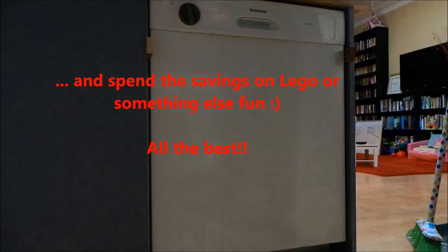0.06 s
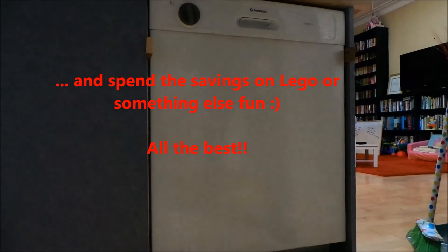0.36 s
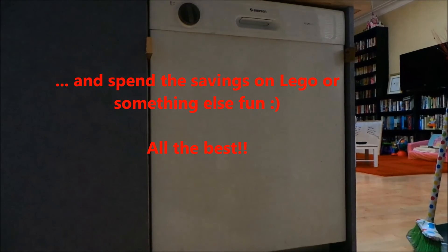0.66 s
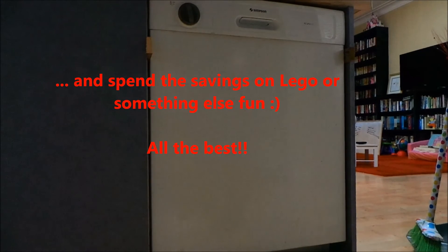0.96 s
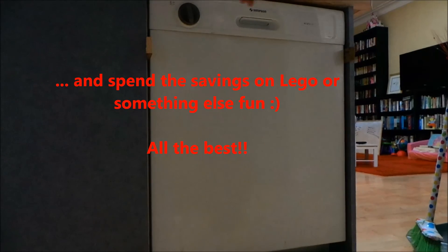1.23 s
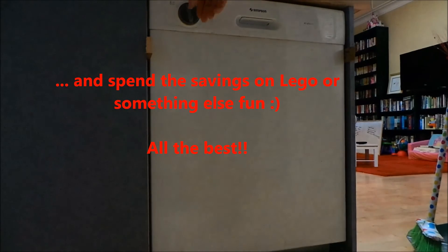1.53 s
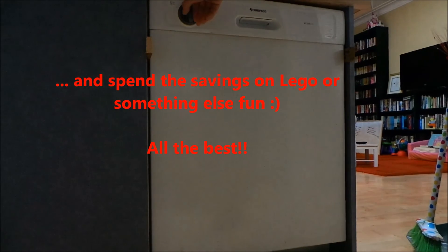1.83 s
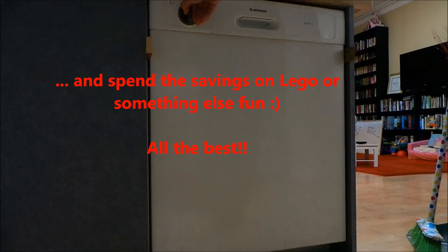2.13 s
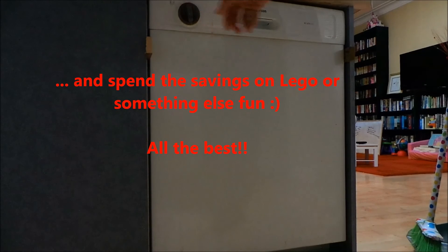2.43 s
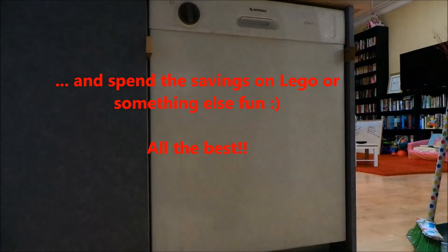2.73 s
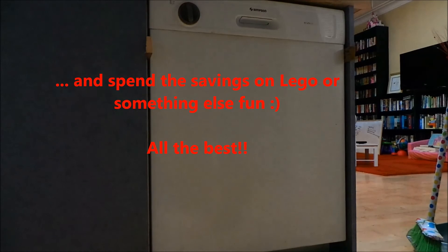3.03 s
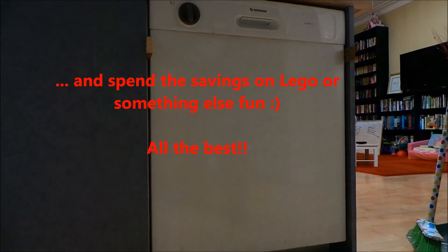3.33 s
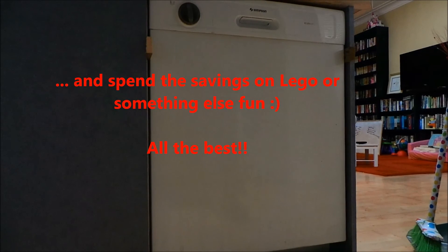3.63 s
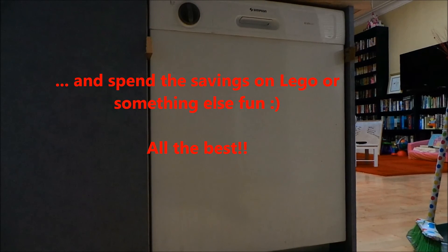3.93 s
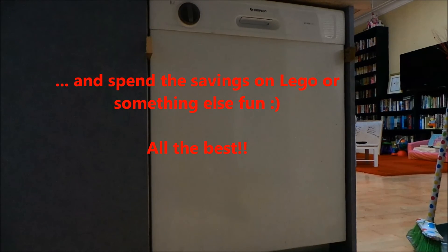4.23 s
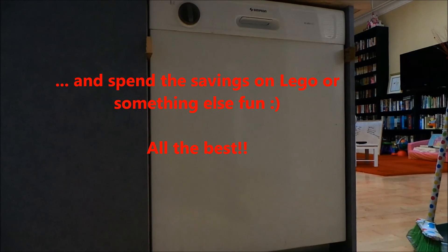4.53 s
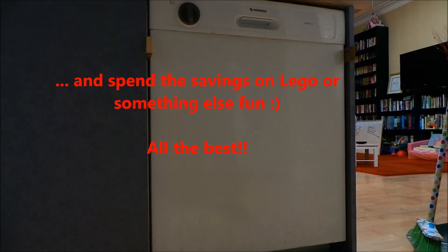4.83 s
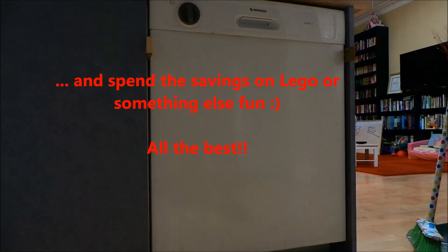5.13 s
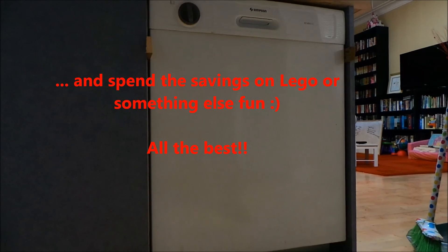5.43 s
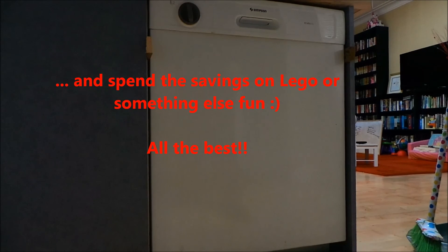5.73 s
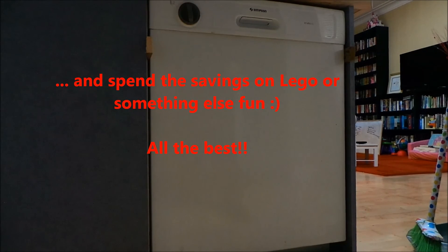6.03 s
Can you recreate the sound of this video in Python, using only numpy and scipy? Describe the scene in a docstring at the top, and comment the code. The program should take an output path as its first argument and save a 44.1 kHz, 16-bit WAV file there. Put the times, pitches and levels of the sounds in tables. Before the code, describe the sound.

In a quiet kitchen, a dishwasher's door and dial give a quick cluster of knocks and clacks over a soft hiss. A switch snaps and the drain pump runs up to a low hum, gulping air and churning water. The panel clacks twice more, and faint drips fall in the tub as the hum carries on. The nearly mono microphone is a couple of metres away.

```python
"""A dishwasher starts up in a kitchen, a couple of metres from a nearly mono microphone.
Door and programme dial knock the front panel, the switch snaps, and the drain pump runs up to a mains hum.
The pump gulps air and churns water, the tub resounds and drips, and the panel clacks twice more.
Underneath lie quiet room tone, a faint drone and a soft hiss that sinks away as the pump starts."""
import sys
import numpy as np
from scipy import signal
from scipy.fft import rfft, irfft
from scipy.io import wavfile
from scipy.ndimage import uniform_filter1d

SR = 44100
rng = np.random.default_rng(int(sys.argv[2]) if len(sys.argv) > 2 else 0)


def generate_wav(sig):
    """Save sig (samples, or channels by samples) to the path in sys.argv[1] as 16-bit PCM at SR."""
    pcm = np.round(np.clip(np.atleast_2d(sig).T, -1, 1) * 32767).astype(np.int16)
    wavfile.write(sys.argv[1], SR, pcm)


N = 268260
SWITCH_S = 2.1025  # the switch snaps and the pump starts


def undb(db):
    """Decibels to gain."""
    return 10 ** (np.asarray(db) / 20)


def unit(x):
    """Scale to rms 1."""
    return x / np.sqrt(np.mean(x ** 2))


def noise(spectrum, size=N):
    """Noise of rms 1, coloured by points of f/Hz, level/dB."""
    hz, db = np.transpose(spectrum)
    f = np.maximum(np.arange(size // 2 + 1) * SR / size, 1)
    gain = undb(np.interp(np.log(f), np.log(hz), db)) * np.minimum(f / hz[0], 1) ** 2
    return unit(irfft(rfft(rng.standard_normal(size)) * gain, size))


def band(x, hz, kind, order=3):
    """Low-pass or high-pass filter."""
    return signal.sosfilt(signal.butter(order, hz, kind, fs=SR, output="sos"), x)


def walk(rate):
    """Smooth random wavering of rms 1, with rate new values a second."""
    hold = int(SR / rate)
    steps = np.repeat(rng.standard_normal(N // hold + 1), hold)
    return unit(uniform_filter1d(uniform_filter1d(steps, hold), hold)[:N])


def ramp(t, start, length):
    """Straight rise from 0 to 1."""
    return np.clip((t - start) / length, 0, 1)


def bump(t, centre, half):
    """Smooth rise and fall, 1 at the centre."""
    return np.exp(-((t - centre) / half) ** 2)


def fade(t, t60):
    """Free decay, 60 dB in t60."""
    return np.exp(-np.log(1000) * t / t60)


def ring(t, modes, stretch=1):
    """Damped modes struck by one blow, a little different each time."""
    return sum(undb(db + rng.normal()) * np.sin(2 * np.pi * hz * t) * fade(t, t60 * stretch)
               for hz, db, t60 in modes)


def burst(x, db):
    """Set the level of a blow's first 30 ms."""
    return x * undb(db) / np.sqrt(np.mean(x[:int(.03 * SR)] ** 2))


def add(track, s, x):
    """Mix x into the track at time s."""
    i = int(s * SR)
    track[i:i + len(x)] += x[:max(N - i, 0)]


def room_tone(t, level_db=-57.5, waver_db=1.66):
    """The quiet kitchen: low noise and a faint drone, both wavering."""
    # colour of the still room: f/Hz, level/dB
    air_colour = [(18, -35), (30, -13), (59, -23), (70, -3.5), (104, 9.5), (121, -14.5), (153, -8),
                  (174, -6), (270, -11), (453, -9.5), (602, -16.5), (1090, -21.5), (1450, -28), (4890, -46),
                  (14500, -41)]
    # tones of the drone: f/Hz, level/dB
    drone_tones = [(48.6, -61), (97.2, -70.5), (145.6, -70), (479, -67.5)]
    drone = sum(undb(db + 1.2 * walk(7.1)) * np.sin(2 * np.pi * hz * t + 0.11 * walk(5.5))
                for hz, db in drone_tones)
    air = unit(band(noise(air_colour), 131, "high", order=2)) * undb(level_db + waver_db * walk(22.45))
    return air + np.sqrt(2) * drone


def soft_hiss(t, start_db=-58.5, sink_db_per_s=4.5, swell_db=10.5, dip_db=-15):
    """A sinking hiss swells around the first knocks, dips briefly and is gone as the pump starts."""
    # colour of the hiss: f/Hz, level/dB
    colour = [(200, 1), (450, 21), (800, 7), (1600, 4), (2300, 5), (3000, 0.5), (6000, -0.5), (8500, -1),
              (10500, 0), (12000, -5.5), (14500, -9)]
    swell = ramp(t, 0.28, 0.073) - ramp(t, 0.643, 0.096)
    level_db = start_db - sink_db_per_s * t + swell_db * swell + dip_db * bump(t, 0.808, 0.018)
    return noise(colour) * undb(level_db) * (1 - ramp(t, 1.83, 0.31))


def kitchen_echo(x, wet_db=-8, low_t60=0.35, high_t60=0.34, high_db=-4, side_db=-7):
    """Diffuse echo off the kitchen walls; only the top treble differs between left and right."""
    t = np.arange(SR * 3 // 4) / SR
    low, high, side = rng.standard_normal((3, len(t)))
    onset = 1 - np.exp(-t / 0.0013)
    low, high = band(low, 2700, "low", order=8), band(high, 2700, "high", order=8)
    tail = onset * (low * fade(t, low_t60) + undb(high_db) * high * fade(t, high_t60))
    spread = onset * band(side, 9600, "high") * fade(t, high_t60) * undb(side_db)
    gain = undb(wet_db) / np.sqrt(np.sum(tail ** 2))
    return np.array([x + gain * signal.fftconvolve(x, tail + sign * spread)[:N] for sign in (1, -1)])


def drips(pitch_spread=0.084, bubbles=7):
    """Each drip in the tub is a little cluster of ringing bubbles of about the same size."""
    # drips and trickles: t/s, f/Hz, level/dB, rough length/s
    drops = [(2.511, 2810, -58, 0.092), (2.54, 2160, -62.5, 0.068), (2.555, 1350, -59, 0.08),
             (2.585, 3100, -65, 0.047), (3.389, 1890, -61, 0.13), (3.715, 1820, -57, 0.02),
             (3.797, 664, -61, 0.037), (4.37, 1130, -64, 0.056), (4.478, 1180, -71, 0.033),
             (4.598, 1040, -63, 0.034)]
    out, t = np.zeros(N), np.arange(SR // 4) / SR
    for s, hz, db, length in drops:
        bubble_hz = hz * (1 + pitch_spread * rng.standard_normal((bubbles, 1)))
        delay = rng.exponential(length / 5, (bubbles, 1))
        age = np.maximum(t - delay + delay.min(), 0)
        cluster = np.sin(2 * np.pi * bubble_hz * age) * fade(age, 0.34 * length)
        add(out, s, burst(cluster.sum(axis=0), db))
    return out


def gulps(glide=-0.056, swell_cycles=0.63):
    """Air pockets in the pump swell over a cycle or so, then ring out with a sinking pitch."""
    # swallows of air and water: t/s, starting f/Hz, peak level/dB, t60/s
    pockets = [(2.105, 232, -35.5, 0.2), (2.125, 146, -36.5, 0.17), (2.172, 137, -30, 0.093),
               (2.174, 285, -31, 0.031), (2.237, 100.3, -25, 0.15), (2.253, 171, -29, 0.072),
               (2.286, 200, -31.5, 0.06), (2.298, 89, -31, 0.21), (2.515, 235, -42, 0.077),
               (2.603, 113.4, -35, 0.29), (2.704, 141, -30.5, 0.051), (2.876, 99, -36, 0.15)]
    out, t = np.zeros(N), np.arange(SR // 3) / SR
    for s, hz, db, t60 in pockets:
        phase = 2 * np.pi * hz * t * (1 + glide * np.minimum(t / t60, 1))
        shape = (1 - np.exp(-t * hz / swell_cycles)) * fade(t, t60)
        add(out, s, undb(db) * np.sin(phase) * shape / shape.max())
    return out


def switch(snap_db=-29, spring_db=-39, t60=0.12, cabinet_db=-19, cabinet_t60=0.19):
    """The start switch snaps over: a bright crack that lingers in the cabinet, and a ringing spring."""
    # colour of the snap: f/Hz, level/dB
    snap_colour = [(120, -28), (200, -10.5), (368, -16), (714, -7.5), (885, -18), (1340, -7), (1460, -13),
                   (2090, -18), (2500, -17), (2990, -17), (6240, -16), (8030, -21), (10100, -12),
                   (11500, -21), (14500, -20.5)]
    # modes of the housing and spring: f/Hz, relative level/dB, t60/s
    spring_modes = [(1300, -4, .18), (1356, -1, .2), (1386, -4, .18), (9747, 3, .15), (10065, 1, .11),
                    (10400, -3, .1), (10750, -3, .1)]
    out, t = np.zeros(N), np.arange(SR // 2) / SR
    shape = (fade(t, t60) + undb(cabinet_db) * fade(t, cabinet_t60)) * (1 - fade(t, 0.013))
    snap = noise(snap_colour, size=len(t)) * shape
    add(out, SWITCH_S, burst(snap, snap_db) + burst(ring(t, spring_modes), spring_db))
    return out


def knocks(modes_db=-3, spot_db=-2, crack=0.19, crack_t60=0.11, tick_t60=0.82, door_t60=0.16):
    """Knocks ring the front panel: the struck spot thuds, the upper modes clack, the contact ticks."""
    # blows on door and controls: t/s, thud/dB, clack/dB, tick/dB, spot f/Hz, clack top f/Hz, t60/s
    blows = [(0.319, -52, -66, -79, 402, 1590, .02), (0.338, -32, -48, -75, 354, 3130, 0.037),
             (0.369, -48, -51.5, -67, 360, 2900, 0.065), (0.393, -71, -58, -58, 400, 3960, 0.016),
             (0.448, -71, -49, -67, 500, 2600, 0.11), (0.4614, -28.5, -27.5, -55, 519, 2760, 0.056),
             (0.485, -57, -47, -59, 480, 2680, 0.039), (0.655, -74, -53, -65, 600, 2820, 0.04),
             (0.667, -57, -55, -73, 700, 1890, 0.023), (0.754, -81, -57, -71.5, 600, 2890, 0.018),
             (0.8443, -42.5, -56, -71, 410, 2630, 0.029), (0.893, -50, -43, -65, 493, 3500, 0.015),
             (0.931, -36.5, -52, -67, 356, 2800, 0.063), (0.9368, -30, -40.5, -61.5, 392, 3460, 0.042),
             (1.638, -54, -56, -63, 338, 5160, 0.021), (1.657, -54, -69, -74, 220, 4000, 0.13),
             (1.871, -83, -73, -67, 480, 4500, 0.011), (3.0382, -27, -32, -51, 475, 3760, 0.08),
             (3.045, -33, -33, -58, 630, 3200, 0.037), (3.052, -28.5, -35.5, -48, 487.3, 3100, 0.2),
             (3.506, -41, -47, -79, 398, 3120, 0.075), (3.555, -26.5, -38.5, -60, 369, 2820, 0.048)]
    # modes of the door panel: f/Hz, relative level/dB, t60/s for a blow that rings for door_t60
    door_modes = [(184, -9, .2), (240, -14, .15), (285, -10, .16), (358, -2, .22), (484, -2, .18),
                  (556, 0, .2), (598, -6, .15), (631, -5, .2), (876, -6, .12), (968, -4, .14),
                  (1196, -4, .15), (1298, -1, .17), (1594, -3, .17), (1831, -3, .14), (1907, -4, .14),
                  (2068, -2, .16), (2112, 0, .17), (2288, -3, .16), (2363, -6, .15)]
    # dense ring of the panel and latch: f/Hz, level/dB
    rattle_colour = [(110, -27), (180, -6), (500, -6), (760, -8), (1000, -2.5), (1300, -3.5), (1480, -6.5),
                     (1750, -4), (2150, -9.5), (2600, -11), (3200, -12.5), (4200, -10.5), (7000, -19.5),
                     (14000, -41)]
    out, t = np.zeros(N), np.arange(SR // 2) / SR
    for s, thud_db, clack_db, tick_db, spot_hz, top_hz, t60 in blows:
        rattle = noise(rattle_colour, size=len(t)) * (fade(t, t60) + crack * fade(t, crack_t60))
        modes = ring(t, door_modes, stretch=t60 / door_t60)  # a hand on the door shortens the ring
        panel = burst(modes, modes_db) + burst(rattle, 0)
        spot = np.sin(2 * np.pi * spot_hz * t) * fade(t, 1.02 * t60)
        thud = band(burst(band(panel, 775, "low"), 0) + burst(spot, spot_db), 220, "high")
        clack = band(band(panel, 520, "high"), top_hz, "low", order=7)  # harder contact, higher modes
        tick = band(rattle, 4020, "high", order=6) * fade(t, tick_t60)
        add(out, s, burst(thud, thud_db) + burst(clack, clack_db) + burst(tick, tick_db))
    return out


def water_levels(t, hiss_db=-59.5, tub_db=-53, churn_db=-42.5):
    """Levels in dB of hiss, tub and churning: steady but for three surges of water."""
    # surges: t/s, half length/s, hiss lift/dB, tub lift/dB, churning lift/dB
    surges = [(2.2, 0.1, 6.5, 7, 5.5), (3.36, 0.17, 4, 5.5, 3.5), (3.598, 0.089, 6, 1, -1.5)]
    lift_db = sum(np.outer(lifts, bump(t, s, half)) for s, half, *lifts in surges)
    return np.array([[hiss_db], [tub_db], [churn_db]]) + lift_db


def draining_water(t, rotor_angle, hiss_db, tub_db, churn_db, slosh_db=-2.5, throb=0.13):
    """Water sloshes in the sump, the tub resounds and throbs with the pump, and the flow hisses."""
    # water churning in the sump: f/Hz, level/dB
    sump_colour = [(40, -22), (70, -15), (92, 6), (115, 12.5), (140, 1.5), (175, 5.5), (215, -0.5),
                   (255, -12), (310, -25), (480, -42)]
    # resonance of the tub: f/Hz, level/dB
    tub_colour = [(250, 8.5), (340, 4), (500, 1.5), (650, -0.5), (720, 0.5), (820, -7), (980, -9.5),
                  (1120, -6), (1450, -13), (2000, -41.5)]
    # hiss of water on its way to the drain: f/Hz, level/dB
    flow_colour = [(300, 9.5), (900, 0), (1700, 0), (2200, 3.5), (2800, 3.5), (3150, 2), (3600, 3.5),
                   (4800, -0.5), (5750, 1), (6700, -2), (8500, -3), (10500, -5.5), (12000, -8.5),
                   (14500, -56)]
    flow = ramp(t, start=1.968, length=0.2)
    slosh = noise(sump_colour) * undb(churn_db + slosh_db + walk(40))
    tub = noise(tub_colour) * undb(tub_db + walk(45)) * (1 + throb * np.sin(2 * rotor_angle))
    hiss = noise(flow_colour) * undb(hiss_db + .5 * walk(50))
    return flow ** 3 * slosh + flow * (tub + hiss)


def pump_hum(t, rotor_angle, churn_db, spin_up_s=0.21):
    """The drain pump hums at twice the mains rate, strongly while its impeller is full of water."""
    # course of the hum: t/s, hum level/dB, octave level/dB
    hum_course = [(2.36, -41.5, -43.5), (3.28, -52, -43.5), (3.41, -31.5, -44), (3.85, -37.5, -43.5),
                  (4.13, -33.5, -44.5), (4.27, -43.5, -48), (4.65, -42, -46.5), (4.95, -38.5, -54.5),
                  (5.65, -36, -48.5), (6.08, -48.5, -47)]
    # side tones, each wavering alone: multiple of the mains, level/dB relative to the churning
    side_tones = [(1, -17.5), (3, -11), (4.5, -12.5), (5, -13), (6, -27.5), (8, -20.5), (10, -22.5),
                  (13.85, -22.5)]
    times, hum_db, octave_db = np.transpose(hum_course)
    hum = np.sin(2 * rotor_angle) * undb(np.interp(t, times, hum_db) + 1.5 * walk(16))
    octave = np.sin(4 * rotor_angle) * undb(np.interp(t, times, octave_db) + 2.5 * walk(16))
    tones = sum(undb(db + 3 * walk(18)) * np.sin(multiple * rotor_angle + rng.uniform(0, 2 * np.pi))
                for multiple, db in side_tones)
    return np.sqrt(2) * ramp(t, SWITCH_S, spin_up_s) * (hum + octave + tones * undb(churn_db))


def drain_pump(t, mains_hz=50, wander_rad=0.16):
    """The mains-locked rotor hums and drives the water, lagging and leading with the load."""
    rotor_angle = 2 * np.pi * mains_hz * t + wander_rad * walk(9)
    hiss_db, tub_db, churn_db = water_levels(t)
    hum = pump_hum(t, rotor_angle, churn_db)
    return hum + draining_water(t, rotor_angle, hiss_db, tub_db, churn_db)


def scene():
    """From a couple of metres: knocks, switch and drips echo in the kitchen over pump and room tone."""
    t = np.arange(N) / SR
    echoing = kitchen_echo(knocks() + switch() + drips())
    return echoing + gulps() + drain_pump(t) + soft_hiss(t) + room_tone(t)


def record(dry):
    """The microphone loses the bass below 25 Hz; the recorder cuts the top above 14450 Hz."""
    microphone = band(dry, 25, "high", order=1)
    return signal.sosfilt(signal.ellip(10, .2, 80, 14450, fs=SR, output="sos"), microphone)


dry = scene()
out = record(dry)
generate_wav(out)
```